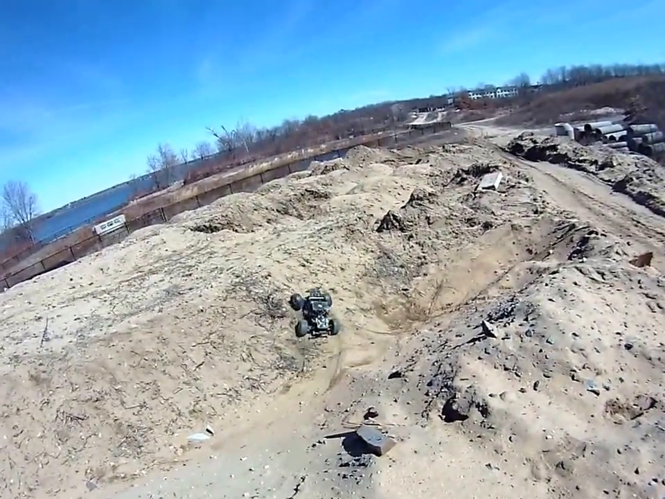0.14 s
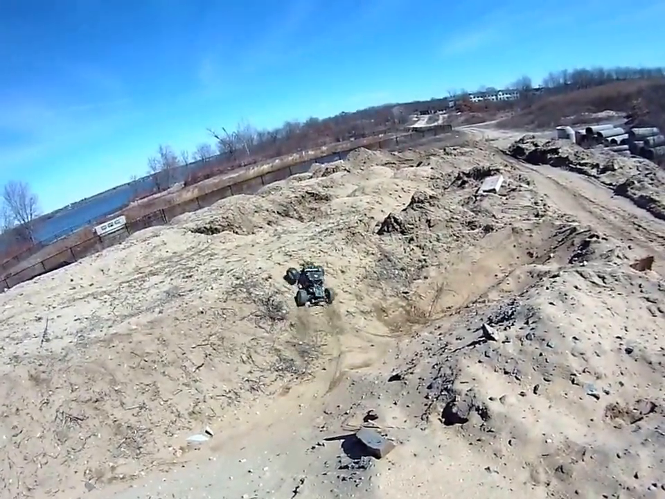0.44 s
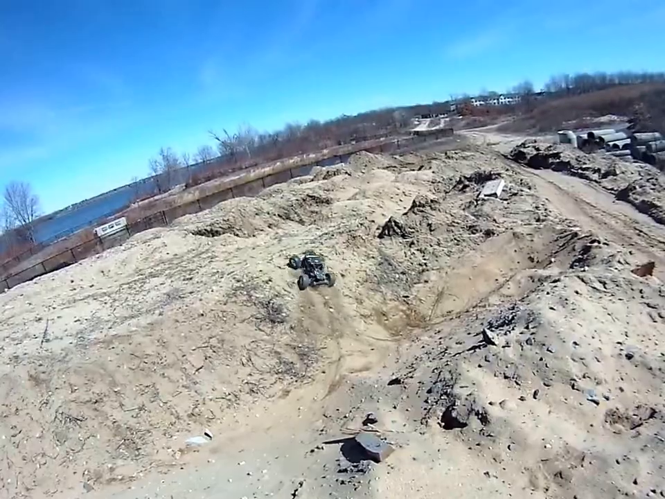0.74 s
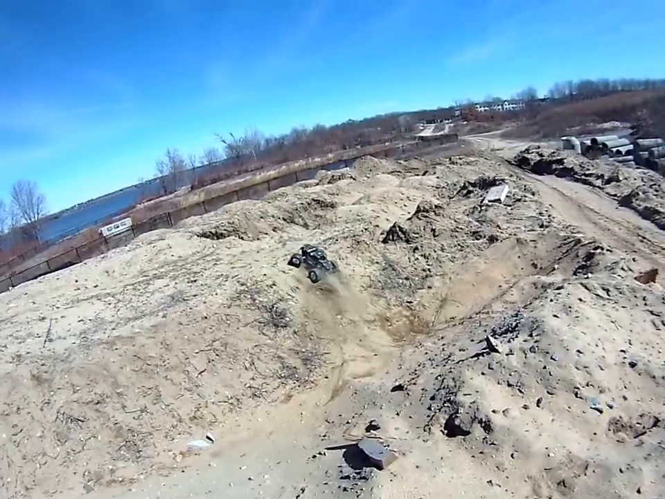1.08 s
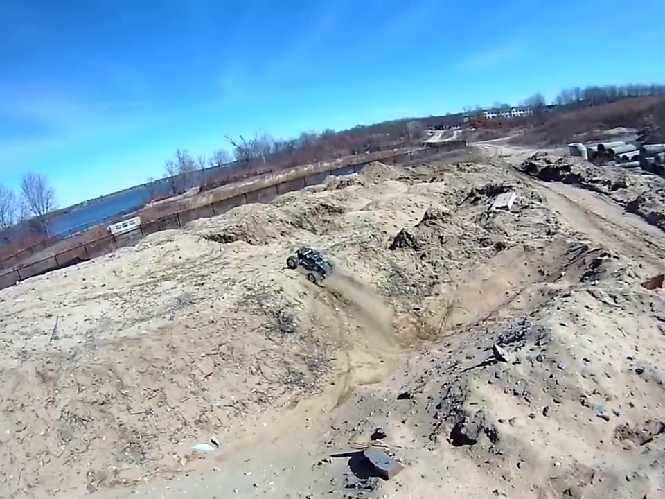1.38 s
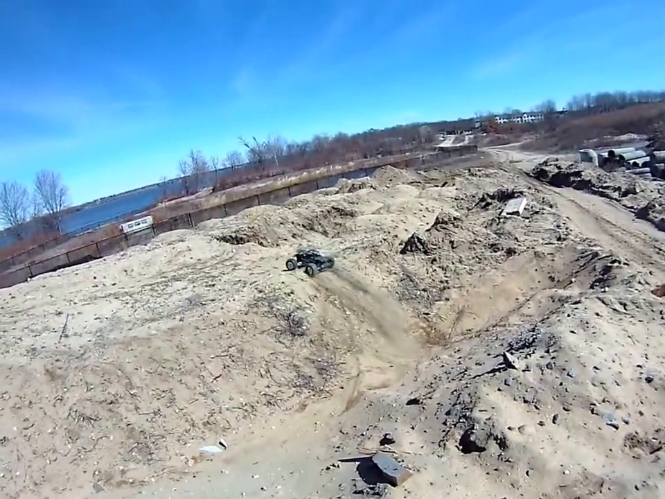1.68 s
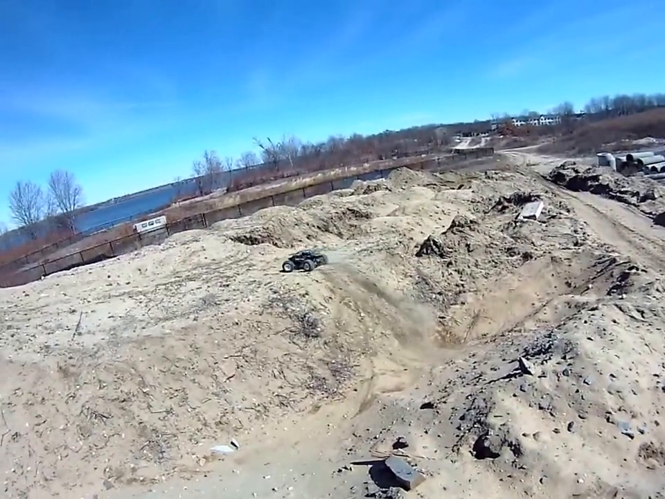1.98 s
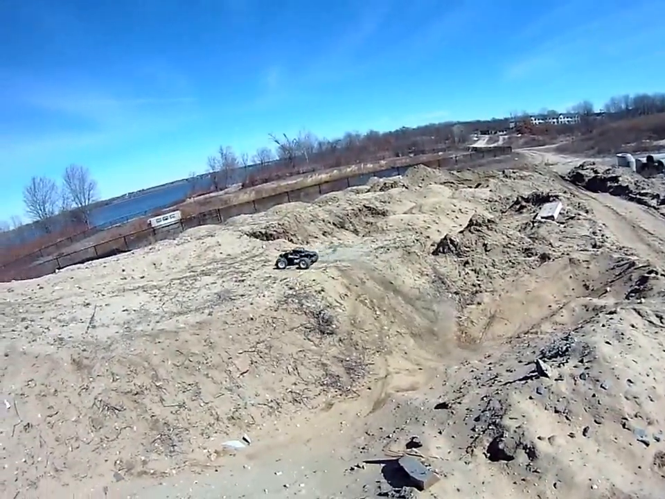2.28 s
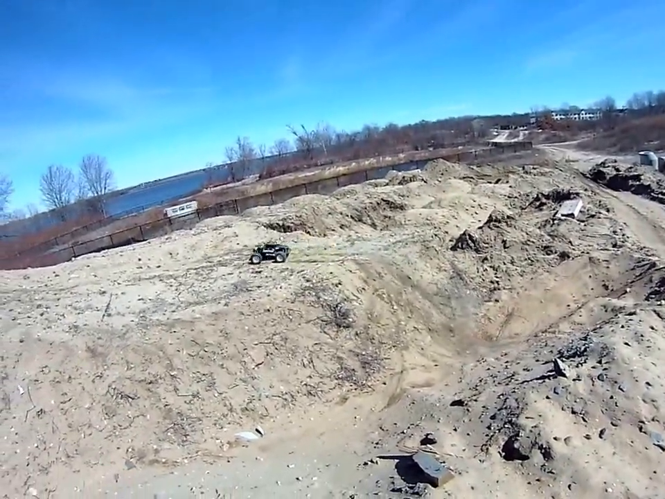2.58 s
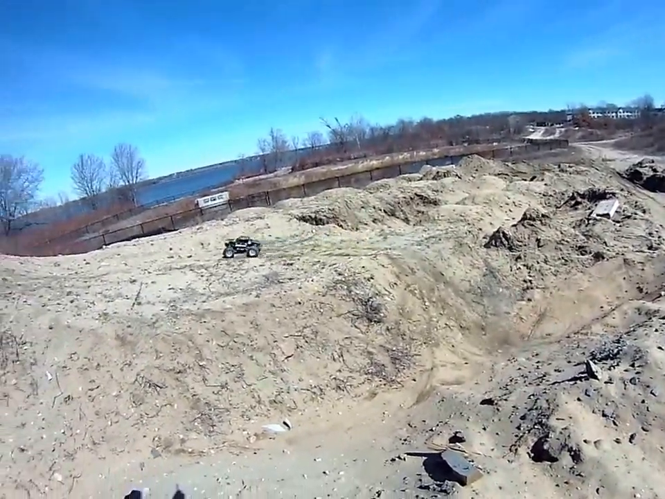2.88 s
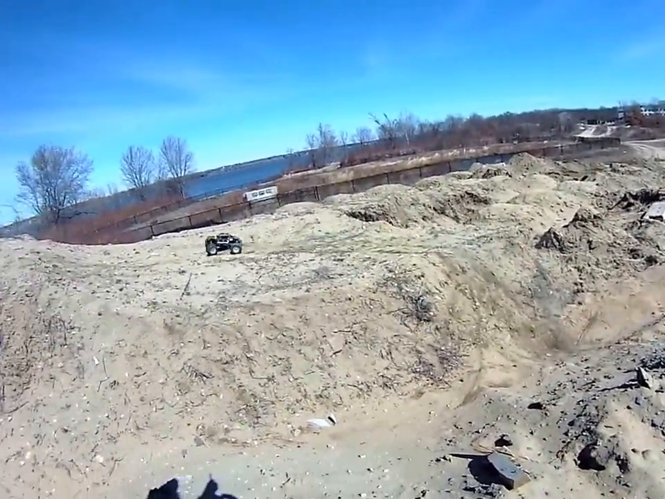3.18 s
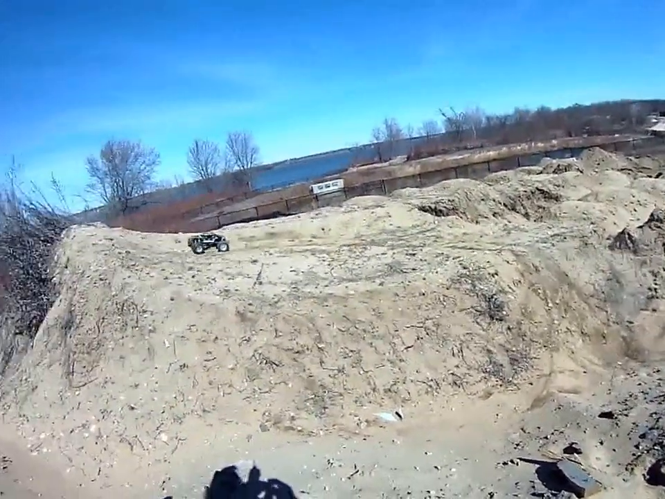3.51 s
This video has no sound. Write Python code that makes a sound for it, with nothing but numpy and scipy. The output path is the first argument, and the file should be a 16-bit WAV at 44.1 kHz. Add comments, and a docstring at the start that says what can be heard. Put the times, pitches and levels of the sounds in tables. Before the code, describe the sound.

A small electric toy truck whines with uneven throttle, its plastic gears chattering and tyres spraying sand. At about 2 seconds it falls quiet for a moment. From 2.3 seconds the whine restarts low and climbs, with a few small plastic ticks, becoming highest and loudest around 3.5 seconds. A faint distant engine drones underneath, and soft wind puffs touch the microphone near 1.6 and 2.7 seconds.

```python
"""A rising and falling whine, plastic chatter and spraying sand: a small electric toy truck climbs a
sand bank, coasts for a moment at the crest and drives off along the top. Its gear teeth whine with
the throttle and scrape in the plastic body, which pings over bumps; the tyres throw sand.
A far engine drones and wind nudges the microphone of a camera whose low sample rate mirrors the
whine into the treble."""
import sys
import numpy as np
from scipy import signal
from scipy.fft import rfft, irfft
from scipy.io import wavfile
from scipy.ndimage import map_coordinates

SR = 44100
rng = np.random.default_rng(int(sys.argv[2]) if len(sys.argv) > 2 else 0)


def store_pcm(level_fs):
    """Save levels as 16-bit WAV."""
    pcm = np.round(np.clip(level_fs, -1, 1) * 32767).astype(np.int16)
    wavfile.write(sys.argv[1], SR, np.atleast_2d(pcm).T)


N = 160965
T = np.arange(N) / SR

# how hard the truck works; it coasts from 2.05 to 2.25 s
# (time [s], whine gain [dB], chatter gain [dB], tyre gain [dB])
EFFORT = [(0.0, -45, -34.5, -40), (0.06, -38, -30.5, -47), (0.11, -32.5, -39.5, -39.5),
          (0.19, -37, -35.5, -44.5), (0.28, -37.5, -34, -42), (0.37, -32.5, -38.5, -38.5),
          (0.41, -37.5, -36, -38.5), (0.5, -35, -35.5, -47), (0.58, -36.5, -39, -38.5),
          (0.66, -36, -39.5, -42), (0.78, -36, -37, -40.5), (0.84, -40.5, -37, -38), (0.93, -39, -42, -45),
          (1.07, -40.5, -44.5, -41.5), (1.16, -36, -40.5, -42.5), (1.24, -38, -44.5, -40.5),
          (1.36, -43.5, -45, -38.5), (1.47, -38.5, -42.5, -41), (1.6, -38.5, -41.5, -41.5),
          (1.75, -40, -41, -41.5), (1.88, -41.5, -47.5, -40), (2.01, -56, -48.5, -52),
          (2.05, -76, -69, -69), (2.246, -82, -77, -76), (2.256, -58, -50, -51), (2.285, -47, -40, -43.5),
          (2.37, -42.5, -49, -46.5), (2.45, -45.5, -43, -46), (2.52, -51, -44.5, -47),
          (2.6, -42.5, -48.5, -47.5), (2.8, -42, -49.5, -50.5), (2.88, -45.5, -46, -48),
          (2.96, -47, -50.5, -43.5), (3.1, -47.5, -45.5, -45.5), (3.24, -50, -42, -47),
          (3.35, -44.5, -46, -43), (3.42, -32.5, -42, -43), (3.52, -31, -38.5, -40), (3.6, -28, -45, -40),
          (3.65, -37, -39.5, -39)]


def undb(db):
    """Turn decibels into a gain."""
    return 10 ** (np.asarray(db) / 20)


def unit(x):
    """Scale a signal to an average (rms) level of 1."""
    return x / np.sqrt(np.mean(x ** 2))


def curve(table, column=1):
    """Join one column of a table with straight lines over time."""
    rows = np.array(table)
    return np.interp(T, rows[:, 0], rows[:, column])


def wander(per_s):
    """A smooth random wiggle of size about 1, with `per_s` new values a second."""
    return unit(map_coordinates(rng.standard_normal(N // 4), [T * per_s + 5], order=3, mode="wrap"))


def colour(x, points):
    """Filter by (frequency [Hz], gain [dB]) points, fading out below the first."""
    hz, db = np.array(points, float).T
    f = np.maximum(np.fft.rfftfreq(2 * N, 1 / SR), 1)
    bass_cut = np.minimum(f / hz[0], 1) ** 2
    return irfft(rfft(x, 2 * N) * bass_cut * undb(np.interp(np.log(f), np.log(hz), db)))[:N]


def noise(points):
    """Filtered noise with an average level of 1."""
    return unit(colour(rng.standard_normal(N), points))


def gear_whine(tooth_hz, teeth, rasp_hz=2500, pivot_hz=1820, shelf_hz=3200, small_gear_teeth=14):
    """Meeting teeth make a tone; slack between the gears smears its higher harmonics into a rasp."""
    # harmonics of the whine (multiple of the tooth rate, relative level [dB])
    harmonics = [(1.0, -3), (2.0, 1), (3.0, -6), (4.0, -2.5), (5.0, -8.5), (6.0, -5.5)]
    # roughness, greatest while the wheels dig in (time [s], ratio of rasp to clean tone at rasp_hz)
    roughness = [(0, .5), (.15, 0.49), (.3, 0.8), (.5, 0.44), (.75, 0.6), (.85, 0.85), (1.1, 0.44),
                 (1.3, 0.59), (1.55, 0.38), (1.9, 0.45), (2.35, 0.54), (2.7, .4), (3.0, 0.66), (3.35, 0.65),
                 (3.5, 0.32), (3.65, 0.33)]
    # brightness as the truck turns and tips (time [s], tilt [dB per octave])
    brightness = [(0, 5.5), (.17, 5.5), (.24, 3), (.36, -3), (.46, 0), (.66, -0.5), (.76, -3), (.9, -2),
                  (1.2, 1.5), (1.7, 4), (2.35, 1.5), (2.48, -0.5), (2.62, 2.5), (3.0, 6.5), (3.33, 0.5),
                  (3.42, 0.5), (3.65, -7)]
    # how the body passes the whine to the air (frequency [Hz], gain [dB])
    body_colour = [(450.0, -12), (760.0, -19.5), (870.0, -2), (1060.0, 1), (1180.0, -0.5), (1360.0, 3),
                   (1600.0, 1), (1900.0, 0), (2150.0, -4), (2380.0, 3), (2650.0, 2.5), (2950.0, -3),
                   (3200.0, -3), (3900.0, -14), (4400.0, -9), (5000.0, -9.5), (5900.0, -25)]
    tone = 0
    for k, db in harmonics:
        rasp = curve(roughness) * np.sqrt(k * tooth_hz / rasp_hz)
        shake = (wander(418.4) + 1j * wander(418.4)) / np.sqrt(2)  # in both level and phase
        smear = (1 + rasp * shake) / np.hypot(1, rasp)
        harmonic = np.real(smear * np.exp(2j * np.pi * (k * teeth + rng.random())))
        tilt_db = curve(brightness) * np.log2(np.minimum(k * tooth_hz, shelf_hz) / pivot_hz)
        flutter_db = 2.5 * wander(129.9)
        tone += undb(db + tilt_db + flutter_db) * harmonic
    # the small gear sits off centre, so the tone swells once per turn
    tone *= 1 + 0.24 * np.sin(2 * np.pi * teeth / small_gear_teeth)
    return plastic_body(colour(tone, body_colour) * undb(curve(EFFORT, column=1) - 1.5))


def gear_chatter(teeth):
    """Each tooth scrapes a short burst of noise into the body."""
    # tone of the scraping (frequency [Hz], gain [dB])
    scrape_colour = [(450.0, -14.5), (760.0, -14), (870.0, -6), (1060.0, -8.5), (1180.0, -4.5),
                     (1360.0, -4.5), (1600.0, -3.5), (1900.0, -8), (2150.0, -4.5), (2380.0, 2),
                     (2650.0, -2), (2950.0, 1), (3200.0, -6), (3900.0, -13), (4400.0, -13.5), (5000.0, -18),
                     (5900.0, -26.5)]
    bursts = 1 + 0.45 * np.cos(2 * np.pi * teeth)
    scrape = rng.standard_normal(N) * bursts * undb(0.4 * wander(300))
    return unit(plastic_body(colour(scrape, scrape_colour))) * undb(curve(EFFORT, column=2) - 1.5)


def plastic_body(x):
    """The plastic shell adds its own ringing to whatever shakes it."""
    # resonances of the shell (frequency [Hz], width [Hz], relative level [dB])
    resonances = [(881, 15, 0.5), (1045, 70, -2), (1358, 77, -5.5), (1899, 67, -10), (2130, 50, -1),
                  (2510, 38, -50), (2745, 96, 1.5), (2907, 106, -3), (3470, 37, -7), (3897, 53, 5.5),
                  (4200, 220, -1.5), (5370, 130, 5)]
    out = x
    for hz, width, db in resonances:
        ringing = signal.lfilter(*signal.iirpeak(hz, hz / width, fs=SR), x)
        out = out + undb(db - 2) * ringing
    return out


def tyres(grains_per_s=5000, size_spread_db=2):
    """Sand grains pelt the truck in spurts while the wheels rumble over the ground."""
    # tone of thrown sand (frequency [Hz], gain [dB])
    sand_colour = [(450.0, -8), (1000.0, -5), (2000.0, 1), (2800.0, -7), (3600.0, 2), (4400.0, 0),
                   (4950.0, -8), (5350.0, -3.5), (5900.0, -15)]
    sizes = undb(size_spread_db * np.minimum(rng.exponential(size=N), 4)) * rng.standard_normal(N)
    grains = sizes * (rng.random(N) < grains_per_s / SR)
    sand = unit(colour(grains, sand_colour)) * undb(-3.5 + 1.35 * wander(120))
    rumble = noise([(120, -6), (245, 2.5), (330, -8.5), (700, -23), (3000, -57)])
    rumble *= undb(-11.5 + 2 * wander(7.3))
    return (sand + rumble) * undb(curve(EFFORT, column=3))


def far_engine(fade_db_per_s=1.9, swell_db=4):
    """A wavering drone that fades as the microphone turns away from the engine."""
    # harmonics of the engine (frequency [Hz], level before fade and swell [dB])
    harmonics = [(32.6, -49.5), (65.3, -47), (98, -51), (131, -61), (165, -60)]
    wavering_time = np.cumsum(1 + 0.0217 * wander(9)) / SR
    drone = 0
    for hz, db in harmonics:
        level = undb(db - fade_db_per_s * T + swell_db * wander(5.008))
        drone += level * np.sqrt(2) * np.sin(2 * np.pi * (hz * wavering_time + rng.random()))
    return drone


def air():
    """Still air and distant noise make a soft, low hush."""
    # tone of the hush (frequency [Hz], gain [dB])
    air_colour = [(20, -11), (55, 5), (110, -4), (200, -8.5), (300, -14), (500, -17.5), (1000, -20.5),
                  (2800, -25.5), (3300, -32), (5000, -35), (5900, -44)]
    return noise(air_colour) * undb(-48.5 + 1.3 * wander(6.4))


def faint_stereo_hush():
    """A faint low hush, separate in each channel."""
    # tone of the hush (frequency [Hz], gain [dB])
    hush_colour = [(30, -2), (330, 9), (900, -1), (2500, -43)]
    return undb(-83) * np.array([noise(hush_colour) for _ in range(2)])


def wind(width_s=0.016):
    """Puffs of wind knock softly on the microphone."""
    # the puffs (time [s], level [dB])
    puffs = [(.09, -48), (.23, -45), (1.6, -36), (1.68, -44), (2.715, -37.5)]
    swells = sum(undb(db) * np.exp(-((T - at) / width_s) ** 2 / 2) for at, db in puffs)
    return swells * noise([(35, 4), (65, 2.5), (180, -5.5), (320, -27), (1500, -46.5)])


def pings(rise_s=0.0019):
    """A bump makes one part of the body ring for a few milliseconds."""
    # the bumps (time [s], pitch [Hz], peak level [dB])
    bumps = [(0.11, 1335, -23.5), (2.288, 940, -35), (2.564, 3005, -32.5), (3.29, 2390, -30.5),
             (3.332, 2993, -29)]
    out = 0
    for start, hz, db in bumps:
        age = np.maximum(T - start, 0)
        envelope = age / rise_s * np.exp(1 - age / rise_s)
        out += undb(db) * envelope * np.sin(2 * np.pi * hz * age)
    return out


def scene():
    """The truck and its surroundings, alike in both channels but for a faint low hush."""
    # speed of the gears (time [s], tooth rate [Hz])
    gear_speed = [(0, 551.6), (0.04, 500), (0.07, 637), (0.11, 677), (0.14, 630), (0.17, 677.3),
                  (0.22, 876.4), (0.25, 854.3), (0.28, 752.4), (0.31, 810.4), (0.36, 710), (0.39, 788),
                  (0.41, 874), (0.47, 950), (0.5, 880), (0.55, 1024), (0.6, 931), (0.63, 720), (0.655, 870),
                  (0.68, 903.5), (0.71, 1068), (0.77, 1111), (0.815, 729.4), (0.87, 935), (0.92, 821),
                  (0.99, 880), (1.02, 983), (1.06, 921), (1.1, 1003), (1.12, 1120), (1.19, 1057),
                  (1.235, 1152), (1.31, 792), (1.35, 961), (1.37, 928), (1.41, 1060), (1.45, 1060),
                  (1.48, 986), (1.55, 958), (1.58, 906.5), (1.62, 952), (1.65, 1090), (1.72, 1033),
                  (1.8, 918.4), (1.89, 830), (2.02, 785), (2.26, 453.7), (2.29, 467), (2.315, 562.6),
                  (2.355, 571), (2.37, 694.6), (2.41, 748), (2.45, 653.6), (2.51, 776), (2.55, 777),
                  (2.59, 889), (2.63, 982), (2.66, 922.4), (2.72, 955), (2.76, 938), (2.81, 989),
                  (2.85, 994), (2.89, 1195), (2.92, 1240), (2.955, 1342), (3.02, 1288), (3.055, 1411),
                  (3.09, 1288), (3.18, 1502), (3.22, 1278), (3.29, 1287), (3.32, 1444), (3.35, 1416),
                  (3.38, 1666), (3.4, 1618), (3.42, 1842), (3.435, 1680), (3.46, 1966), (3.485, 1802),
                  (3.51, 2020), (3.555, 1829), (3.6, 2020), (3.65, 1996)]
    wheel_slip = 0.016 * wander(109.97)
    uneven_teeth = 0.0156 * wander(894)
    tooth_hz = curve(gear_speed) * (1 + wheel_slip + uneven_teeth)
    teeth = np.cumsum(tooth_hz) / SR  # how many teeth have met so far
    gears = gear_whine(tooth_hz, teeth) + gear_chatter(teeth)
    jolts = undb(wander(79.7))  # bumps load the whole drive
    truck = gears * jolts + tyres() + pings()
    return truck + far_engine() + air() + wind() + faint_stereo_hush()


def record(dry, hold_hz=12000, top_hz=15800):
    """The camera holds samples at a low rate, mirroring the sound; its uneven clock adds grit."""
    f = np.fft.rfftfreq(N, 1 / SR)
    narrow = irfft(rfft(dry) * (f < hold_hz / 2), N)
    mirrored = narrow * (1 + 2 * np.cos(2 * np.pi * hold_hz * T))
    treble_loss = np.sinc(f / hold_hz) * undb(-0.9 * f / hold_hz)
    held = irfft(rfft(mirrored) * treble_loss, N)
    grit = undb(-10) * np.gradient(narrow, axis=1) * rng.standard_normal(N)
    hiss = undb(-74) * rng.standard_normal((2, N))
    top_cut = signal.ellip(12, .2, 80, top_hz, fs=SR, output="sos")
    return signal.sosfilt(top_cut, held + grit + hiss)


dry = scene()
out = record(dry)
store_pcm(out)
```